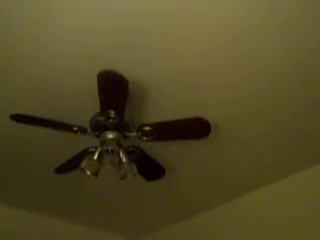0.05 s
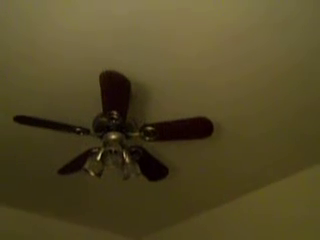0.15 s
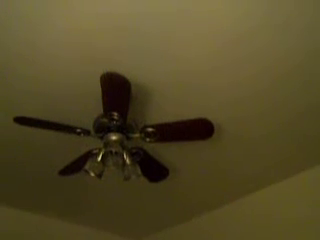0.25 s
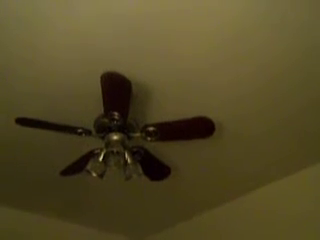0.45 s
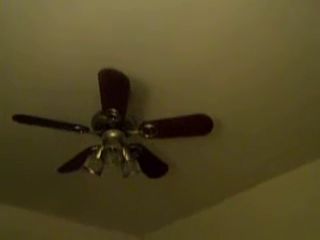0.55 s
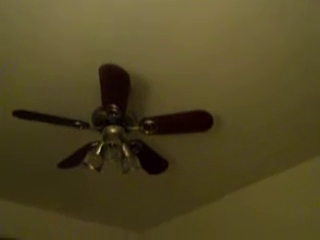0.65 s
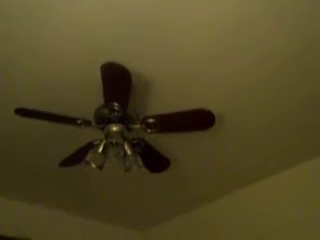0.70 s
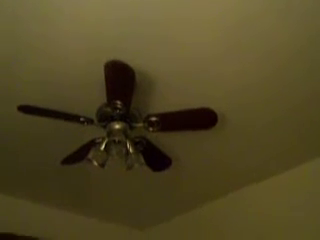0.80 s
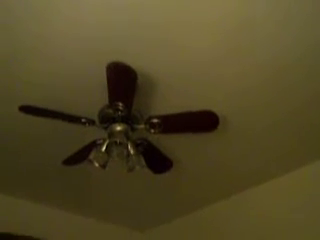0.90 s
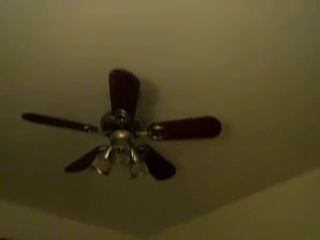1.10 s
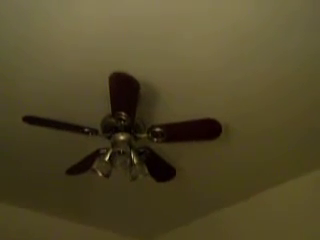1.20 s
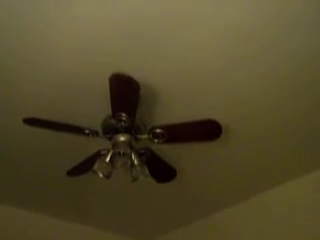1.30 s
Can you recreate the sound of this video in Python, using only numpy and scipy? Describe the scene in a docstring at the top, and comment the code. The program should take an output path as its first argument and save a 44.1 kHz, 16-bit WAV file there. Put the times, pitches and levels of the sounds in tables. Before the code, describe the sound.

Three dull, hollow knocks through a ceiling at about 0.2, 0.45 and 0.7 seconds, each harder than the one before. Each has a firm front, a short crack and rattle with a quick rebound, and a woody boom dying within a third of a second. Very soft low bumps occur at the start, near 0.25 and 0.95; a small sharp click at 1.02. Faint rumble, hiss and thin high whine underneath.

```python
"""Three dull knocks, each harder than the last, come through the ceiling of a quiet room.
Each is damped panel notes, a crack and a noisy rattle with thin notes, one rebound,
and a swelling boom of reverberant noise and ceiling modes. Soft bumps (low noise and a joist note)
lie around them; one small sharp click (a noise burst and its reverberation) comes near the end.
Beneath: shaped noise for low rumble and faint hiss, and two sines for a thin electrical whine."""
import sys
import numpy as np
from scipy import signal
from scipy.fft import rfft, irfft
from scipy.io import wavfile

SR = 44100
rng = np.random.default_rng(int(sys.argv[2]) if len(sys.argv) > 2 else 0)


def generate_wav(signal):
    """Clip the signal to [-1, 1] and save it as 16-bit WAV at the path in sys.argv[1]."""
    frames = np.transpose(np.atleast_2d(signal))
    scaled = np.clip(frames, -1, 1) * 32767
    pcm = np.round(scaled).astype(np.int16)
    wavfile.write(sys.argv[1], SR, pcm)


N = 59535
T, HZ = np.arange(N) / SR, np.fft.rfftfreq(2 * N, 1 / SR)

# Knocks: (time [s], level [dB], bass [dB], ceiling modes [dB], panel front [dB], rattle and crack [dB],
# rebound delay [s]); the four part levels are relative
KNOCK_BLOWS = [(0.199, -7.5, 2, -7, 2, -3, .03), (0.448, -4, 4, 1, 2, -6.5, 0.041),
               (0.68, 0.5, -1, 2, 0, -1, 0.033)]
# Quickly damped notes of the struck panel: (frequency [Hz], relative level [dB], t60 [s])
PANEL_MODES = [(182.7, 2.5, 0.09), (464, -11, .05), (580, 3, .08), (782, -8, .09), (831, -13, 0.15),
               (980, -18, 0.05)]
# Ceiling modes: (frequency [Hz], relative level [dB], t60 [s])
CEILING_MODES = [(66, -23, .4), (128, -15, .42), (169, -11, .4), (203, -15, .34), (240, -15, .45),
                 (291, -5, .27), (308, -3, .26), (342, -1, .25), (367, 0, .27), (425, -2, .23),
                 (521, -14, .28), (572, -8, .2), (604, -8, .2), (640, -15, .24), (695, -15, .28),
                 (762, -14, .22)]
# Dense response of ceiling and room to a blow: (frequency [Hz], relative density [dB per Hz])
BOOM_COLOUR = [(25, -20.5), (65, -9), (130, 0), (210, -1), (330, 2), (430, -7), (500, -8.5), (600, -8),
               (800, -18), (1050, -18), (1600, -28.5), (4000, -52)]
# Rattle of the ceiling's surface: (frequency [Hz], relative density [dB per Hz])
RATTLE_COLOUR = [(300, -22), (900, -11.5), (1400, 2.5), (1650, -6.5), (1900, 3), (2450, -0.5), (3100, -5),
                 (3900, -10.5), (4800, -22), (8000, -38.5)]
# Thin notes in the rattle: (frequency [Hz], relative level [dB], t60 [s])
RATTLE_NOTES = [(1085, -6, .3), (1428, -1, .3), (1880, -1, .22), (2140, -5, .25), (2176, -4, .25),
                (2467, 0, .3), (2833, -6, .27), (3890, -13, .3)]
# Reverberation: (band centre [Hz], t60 [s])
ROOM_DECAY = [(60, .36), (150, .34), (400, .26), (1000, .31), (2500, .33), (5000, .27)]
# Soft bumps overhead: (time [s], level [dB], upper edge [Hz])
SOFT_BUMPS = [(-0.015, -40.5, 420), (0.025, -46.5, 280), (0.245, -37, 280), (0.94, -43, 121)]
# Small sharp click: (time [s], reverberation level [dB])
CLICK_S, CLICK_TAIL_DB = (1.0175, -40.5)
# Click reverberation: (frequency [Hz], relative density [dB per Hz])
CLICK_TAIL_COLOUR = [(200, -14), (700, -8), (1300, -18.5), (1900, -10), (2200, -9), (2500, 1.5),
                     (3200, -1.5), (4200, -8.5), (5200, -16), (8000, -37.5)]
# Background noise: (frequency [Hz], relative density [dB per Hz])
FLOOR_COLOUR = [(15, -48.5), (28, -9), (60, -4.5), (96, -5.5), (190, -7), (240, -7), (310, -5.5),
                (400, -17), (540, -14.5), (680, -15), (980, -17.5), (1480, -18.5), (2360, -24.5),
                (3700, -23.5), (7250, -28.5), (8600, -40)]
# Faint upper hiss: (time [s], level [dB])
HISS_LEVEL = [(0, -60.5), (0.38, -59.5), (0.6, -67), (0.9, -68), (1.35, -64)]
# Electrical whine: (frequency [Hz], RMS level [dB])
WHINE_TONES = [(7381, -67.5), (8619, -81.5)]

# *_RISE_S: time constants; *_WIDTH: Gaussian sigma [natural-log frequency]
PANEL_DB, PANEL_RISE_S = -26, 0.0014
BOOM_DB, BOOM_RISE_S, BOOM_HOLD_S = -27.5, 0.0083, 0.057
MODES_DB, MODES_RISE_S = -18, 0.028
DETUNE_FRACTION = 0.0033  # standard deviation, drawn afresh at each ringing
BASS_HZ, BASS_LAG_S = 165, 0.01434
RATTLE_DB, RATTLE_RISE_S, RATTLE_NOTES_DB = -33, 0.0026, -8
CRACK_DB, CRACK_LAG_S, CRACK_SPREAD_S, CRACK_HZ, CRACK_WIDTH = -32, 0.0058, 0.0029, 2360, 0.35
REBOUND_SURFACE_DB, REBOUND_PANEL_DB = -11, -15.5
BUMP_RISE_S, BUMP_LOW_HZ = 0.0059, 71
JOIST_HZ, JOIST_DB, JOIST_T60_S = 92.4, -4, 0.82
SNAP_DB, SNAP_LAG_S, SNAP_SPREAD_S, SNAP_HZ, SNAP_WIDTH = -35.5, 0.004, 0.0022, 3430, 0.25
CLICK_TAIL_RISE_S = 0.00083
FLOOR_DB, HISS_HZ, HISS_WIDTH = -52, 3300, 0.37
EDGE_HZ = 8600


def knocks():
    """Each blow sounds panel, surface and boom; the bass lags, and panel and surface rebound once."""
    out = np.zeros(N)
    bass_gain = 1 / (1 + (HZ / BASS_HZ) ** 4)
    for time_s, level_db, bass_db, modes_db, front_db, surface_db, rebound_s in KNOCK_BLOWS:
        front = panel_front(front_db)
        body = ceiling_body(modes_db)
        surface = amp(level_db + surface_db) * ceiling_surface()
        add(out, time_s, amp(level_db) * (front + shaped(body, 1 - bass_gain)))
        add(out, time_s + BASS_LAG_S, amp(level_db + bass_db) * shaped(body, bass_gain))
        add(out, time_s, surface)
        rebound = amp(REBOUND_SURFACE_DB) * surface + amp(level_db + REBOUND_PANEL_DB) * front
        add(out, time_s + rebound_s, rebound)
    return out


def panel_front(front_db):
    """Firm front: the struck panel's modes, heavily damped."""
    return amp(PANEL_DB + front_db) * ringing(PANEL_MODES) * rise(PANEL_RISE_S)


def ceiling_body(modes_db):
    """Swelling boom: dense reflections plus the ceiling's discrete modes."""
    boom = amp(BOOM_DB) * tail(amp(read(BOOM_COLOUR, HZ)), BOOM_HOLD_S) * rise(BOOM_RISE_S)
    modes = amp(MODES_DB + modes_db) * ringing(CEILING_MODES) * rise(MODES_RISE_S)
    return boom + modes


def ceiling_surface():
    """Surface rattle: decaying noise and thin notes, with a short noise crack."""
    grains = tail(amp(read(RATTLE_COLOUR, HZ)))
    notes = amp(RATTLE_NOTES_DB) * ringing(RATTLE_NOTES)
    rattle = (grains + notes) * rise(RATTLE_RISE_S)
    crack = burst(CRACK_HZ, CRACK_WIDTH, CRACK_LAG_S, CRACK_SPREAD_S)
    return amp(RATTLE_DB) * rattle + amp(CRACK_DB) * crack


def bumps():
    """Soft shifts of weight stir only the bass and the joists' low note."""
    out = np.zeros(N)
    low_ratio = (HZ / BUMP_LOW_HZ) ** 2
    joist_decay = np.exp(-np.log(1000) * T / JOIST_T60_S)
    joist = amp(JOIST_DB) * np.sin(2 * np.pi * JOIST_HZ * T) * joist_decay
    for time_s, level_db, edge_hz in SOFT_BUMPS:
        thud = tail(low_ratio / (1 + low_ratio) / (1 + (HZ / edge_hz) ** 3))
        add(out, time_s, amp(level_db) * rise(BUMP_RISE_S) * (thud + joist))
    return out


def click():
    """A small hard snap inside the room, and its reverberation."""
    out = np.zeros(N)
    snap = burst(SNAP_HZ, SNAP_WIDTH, SNAP_LAG_S, SNAP_SPREAD_S)
    reverberation = tail(amp(read(CLICK_TAIL_COLOUR, HZ))) * rise(CLICK_TAIL_RISE_S)
    add(out, CLICK_S, amp(SNAP_DB) * snap)
    add(out, CLICK_S, amp(CLICK_TAIL_DB) * reverberation)
    return out


def background():
    """Steady shaped noise weighted to the lows, hiss of varying level, and a steady whine."""
    floor = amp(FLOOR_DB) * noise(amp(read(FLOOR_COLOUR, HZ)))
    hiss_level = amp(np.interp(T, *np.transpose(HISS_LEVEL)))
    hiss = hiss_level * noise(hump(HISS_HZ, HISS_WIDTH))
    whine = sum(amp(db) * np.sqrt(2) * np.sin(2 * np.pi * hz * T) for hz, db in WHINE_TONES)
    return floor + hiss + whine


def ringing(modes):
    """Exponentially decaying, slightly detuned sines; neighbours start in opposite directions."""
    out = np.zeros(N)
    drift = 1 + DETUNE_FRACTION * rng.standard_normal(len(modes))
    for k, (hz, db, t60_s) in enumerate(modes):
        decay = np.exp(-np.log(1000) * T / t60_s)
        out += (-1) ** k * amp(db) * decay * np.sin(2 * np.pi * hz * drift[k] * T)
    return out


def tail(gain, hold_s=0):
    """Dense reflections of one colour; each band holds, then dies at the room's rate."""
    out = np.zeros(N)
    spectrum = rfft(noise(gain), 2 * N)
    centres_hz = [hz for hz, _ in ROOM_DECAY]
    for share, (_, t60_s) in zip(np.eye(len(ROOM_DECAY)), ROOM_DECAY):
        # overlapping bands, triangular in log frequency, that sum to one
        band = irfft(spectrum * read(list(zip(centres_hz, share)), HZ))[:N]
        out += band * np.exp(-np.log(1000) * np.maximum(T - hold_s, 0) / t60_s)
    return out


def burst(hz, width, lag_s, spread_s):
    """A few milliseconds of noise around one pitch, under a Gaussian envelope."""
    return noise(hump(hz, width)) * np.exp(-0.5 * ((T - lag_s) / spread_s) ** 2)


def hump(hz, width):
    """Gaussian gain in log frequency."""
    return np.exp(-0.5 * (np.log((HZ + 1) / hz) / width) ** 2)


def noise(gain):
    """Gaussian noise of the given colour and unit RMS."""
    return evened(shaped(rng.standard_normal(N), gain))


def shaped(x, gain):
    """Filters by a gain for each frequency."""
    return irfft(rfft(x, 2 * N) * gain)[:N]


def evened(x):
    """Scales to unit RMS."""
    return x / np.sqrt(np.mean(x ** 2) + 1e-20)


def rise(seconds):
    """Exponential approach to one."""
    return 1 - np.exp(-T / seconds)


def read(points, hz):
    """Interpolates a table in log frequency."""
    f, value = np.transpose(points)
    return np.interp(np.log(hz + 1), np.log(f + 1), value)


def amp(db):
    """Decibels to amplitude."""
    return 10 ** (np.asarray(db) / 20)


def add(mix, time_s, sound):
    """Mixes a sound in at a time, trimmed to both ends."""
    start = round(time_s * SR)
    part, sound = mix[max(start, 0):], sound[max(-start, 0):]
    part[:len(sound)] += sound[:len(part)]


def scene():
    """Sums all sources into one channel."""
    return (knocks() + bumps() + click() + background())[None]


def record(dry):
    """The recorder's band limit: a linear-phase low-pass."""
    lowpass = signal.firwin(301, EDGE_HZ, window=("kaiser", 9), fs=SR)
    return signal.oaconvolve(dry, lowpass[None], "same")


dry = scene()
out = record(dry)
generate_wav(out)
```